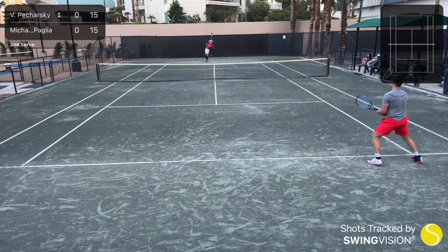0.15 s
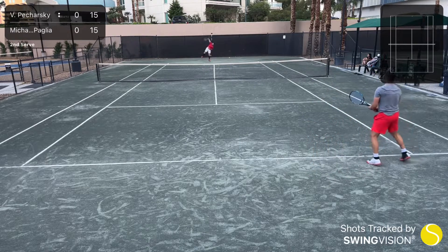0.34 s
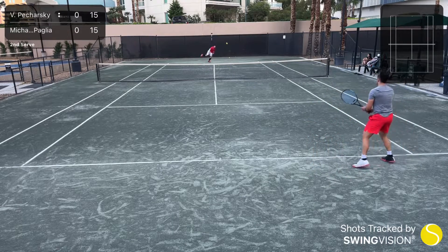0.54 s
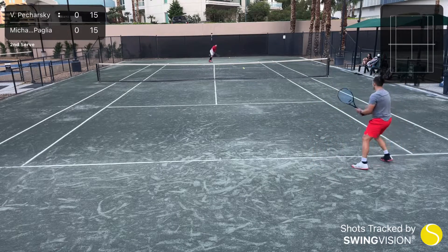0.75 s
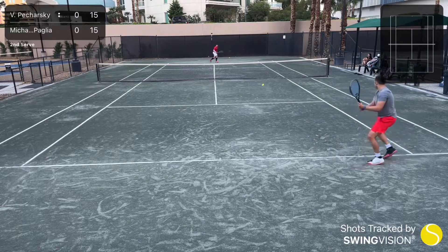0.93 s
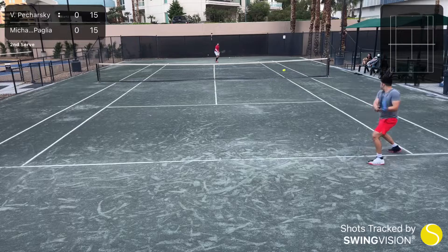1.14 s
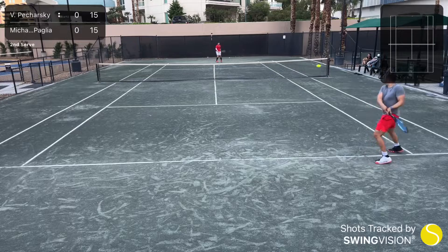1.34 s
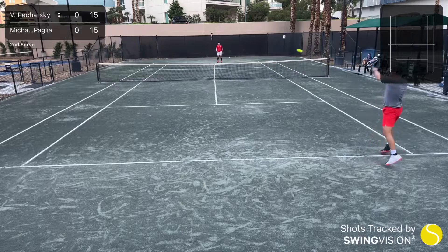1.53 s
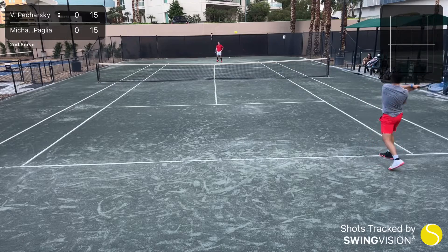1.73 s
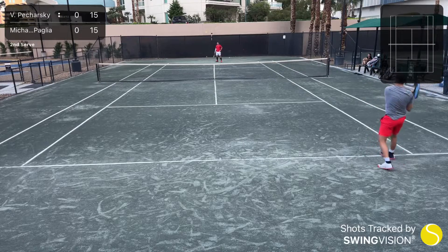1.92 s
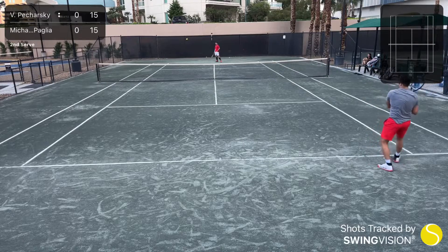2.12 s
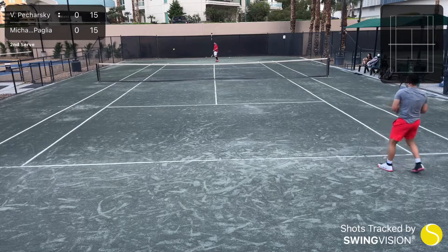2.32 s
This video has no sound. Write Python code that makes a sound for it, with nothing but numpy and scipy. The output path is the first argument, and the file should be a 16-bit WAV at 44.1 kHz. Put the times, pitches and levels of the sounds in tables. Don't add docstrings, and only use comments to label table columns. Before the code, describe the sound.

One sharp tennis racket hit at 1.5 seconds: a crack with briefly ringing strings, quick ground bounce and faint fence and wall echoes. Before it, shoes scuff gritty clay, strongest around 0.6 and 0.9; pebbles tick, and scrapes return near 1.9 and 2.35. Wind grows from 0.3, rumbling and slapping the bare microphone. Distant city wash and thin whine continue; a tiny bird chirps at 2.2.

```python
import sys
import numpy as np
from scipy import signal
from scipy.fft import rfft, irfft, next_fast_len
from scipy.io import wavfile
from scipy.ndimage import uniform_filter1d

SR = 44100
rng = np.random.default_rng(int(sys.argv[2]) if len(sys.argv) > 2 else 0)


def digitize_waveform(pressure):
    field = np.atleast_2d(pressure).T
    bounded = np.clip(field, -1, 1)
    quanta = np.round(bounded * 32767).astype(np.int16)
    wavfile.write(sys.argv[1], SR, quanta)


def invert_db(x):
    u = np.asarray(x, float) / 20
    return 10 ** u


N = 108706

# time in seconds, deep rumble in dB, flutter above it in dB.
GUST = [(0, -38, -2), (.15, -33, -11), (.33, -25.5, -8), (.45, -26.5, -12), (.56, -23.5, -4),
        (.68, -21, -10.5), (.78, -25.5, -4), (.88, -20, -4), (1.05, -22.5, -9), (1.2, -20.5, -11.5),
        (1.4, -22, -5), (1.5, -17, 0), (1.535, -29, 0.5), (1.62, -17.5, -1), (1.85, -19, -3.5),
        (2.05, -20.5, -3.5), (2.25, -21.5, -7.5), (2.46, -23, -7)]
# frequency in Hz, level in dB.
RUMBLE_SPECTRUM = [(20, -28), (40, -11), (60, -1), (95, -0.5), (130, -6), (200, -19), (400, -61.5)]
# frequency in Hz, level in dB.
FLUTTER_SPECTRUM = [(60, -50), (120, -6), (180, -0.5), (260, -5), (400, -14), (600, -25), (1000, -35.5),
                    (2000, -60.5)]
# start in seconds, peak in dB, pitch in Hz.
BUFFETS = [(.249, -18, 70), (0.3082, -15, 180), (.499, -15, 124), (.651, -11.5, 200), (0.689, -11.5, 242),
           (.728, -12, 196), (.771, -11, 221), (.79, -13.5, 254), (.838, -10.5, 116), (.9665, -13, 115),
           (1.026, -17, 234), (1.117, -6, 123), (1.283, -10.5, 114), (1.36, -9.5, 177), (1.428, -9.5, 190),
           (1.473, -9, 204), (1.555, -11, 240), (1.559, -10, 225), (1.564, -10, 225), (1.569, -9, 210),
           (1.573, -5, 165), (1.6, -7, 112), (1.656, -10, 280), (1.659, -8, 108.4), (1.676, -9, 133),
           (1.692, -9.5, 122), (1.725, -13.5, 172), (1.789, -12, 108), (1.845, -9.5, 118),
           (1.866, -10.5, 111), (1.9433, -12, 200), (1.998, -12, 274), (2.015, -13, 138),
           (2.058, -10.5, 123), (2.135, -12, 170), (2.1774, -10.5, 186), (2.345, -9, 121), (2.437, -14, 90)]
# frequency in Hz, density in dB per Hz.
WASH_SPECTRUM = [(300, -21.5), (600, -22), (900, -23), (1900, -30.5), (3000, -33), (5200, -41.5),
                 (9000, -45.5), (16000, -51)]
# loudest moment, rise and fall in seconds, level in dB, centre of the grit in Hz.
SCUFFS = [(.04, 0.09, 0.061, -42.5, 3770), (.31, 0.047, 0.1, -46.5, 12000),
          (.365, 0.073, 0.094, -44.5, 3600), (.455, 0.011, 0.019, -56, 13000), (.5, 0.057, 0.1, -41, 4770),
          (.585, 0.015, 0.055, -37.5, 5970), (.58, .02, .04, -41, 1200), (.599, 0.022, 0.018, -33, 2770),
          (.645, 0.013, 0.016, -47, 4460), (.76, 0.016, 0.024, -47.5, 5000), (.83, 0.023, 0.022, -41, 3900),
          (.912, 0.054, 0.054, -35, 1040), (.91, 0.024, .06, -37, 2100), (.955, 0.062, 0.043, -35.5, 3540),
          (.99, .03, 0.044, -46, 7000), (1.012, 0.019, 0.013, -38, 13000),
          (1.122, 0.0058, 0.018, -43, 7500), (1.137, 0.017, 0.0079, -36, 12000),
          (1.15, 0.024, 0.046, -55, 4000), (1.28, 0.025, 0.062, -38.5, 1250),
          (1.275, 0.012, 0.095, -43, 4900), (1.48, 0.05, 0.028, -46.5, 8040),
          (1.622, 0.022, 0.013, -43.5, 9000), (1.86, 0.11, 0.024, -41, 6900),
          (1.885, 0.055, 0.052, -34.5, 2440), (2.13, 0.043, 0.034, -51.5, 6460),
          (2.27, .01, .02, -61, 13000), (2.35, .014, 0.079, -36.5, 4900), (2.4, 0.042, 0.033, -37.5, 2630)]
# time in seconds, peak in dB,
# pitch in Hz.
PEBBLES = [(.03, -33, 6000), (0.058, -31, 2200), (.082, -40, 11000), (.26, -33.5, 10000), (.3, -36, 11000),
           (.312, -36, 14000), (.375, -26, 10000), (.45, -35, 14000), (.486, -35, 6000), (.313, -24, 335),
           (.339, -23, 7100), (.377, -23, 1090), (0.414, -30, 2500), (.545, -31, 3000), (.583, -17.5, 6000),
           (.643, -32, 5000), (.752, -43, 6000), (.82, -36, 5000), (.864, -25.5, 8000), (1.013, -30, 12000),
           (1.172, -38, 10000), (1.181, -38, 9000), (1.266, -34, 12000), (1.484, -33, 9000),
           (1.791, -33, 9000), (2.349, -26, 6500), (2.441, -31, 6000), (.905, -26, 750),
           (.929, -20.5, 1150), (.973, -27, 5000), (1.116, -31, 450), (1.15, -28, 3970), (1.556, -19, 420),
           (1.565, -23, 500), (1.579, -15.5, 380), (1.599, -21, 480), (1.589, -20, 330), (1.626, -25, 594),
           (1.68, -22, 420), (1.657, -15.5, 512), (1.6585, -30, 3000), (1.699, -28, 11000),
           (1.617, -20, 13500),
    (1.7158, -20, 13000),
    (1.7165, -20, 8500),
    (1.717, -14, 14500),
]
# frequency in Hz, level in dB.
CRACK_SPECTRUM = [(300, -15), (1000, 5), (2000, -11.5), (3500, 2), (5200, -4), (8000, -1), (12000, 0),
                  (16000, -3.5)]
STRING_HZ = [300, 550, 925, 1040, 1700, 2250, 3200, 4200, 4950, 5500, 7100]
# level in dB, time to fall 60 dB in seconds.
STRINGS = [(-10.5, 0.059), (-14.5, 0.046), (-14, 0.04), (-19.5, 0.051), (-29, 0.044), (-28, 0.037),
           (-17.5, 0.031), (-18, 0.03), (-17.5, 0.023), (-22, 0.021), (-20, 0.028)]
# delay in seconds, level in dB.
ECHOES = [
    (0.02, -21),
    (.06, -18),
    (.153, -22.5),
]
# start and length in seconds, first and last pitch in Hz, level in dB.
CHIRPS = [
    (2.194, .066, 4750, 2800, -53),
    (2.265, .025, 3500, 2950, -58),
]
# frequency in Hz, gain in dB.
MIC_RESPONSE = [(2000, 0.5), (9000, -5.5), (9700, -13), (11000, -12.5), (13000, -5.5), (15700, -5),
                (16000, -26), (16500, -34)]

STEADY_S, STEADY_SHARE = 0.038, 0.38
FLAPS_DB, FLUTTER_DB = 3.0, -1.5
BUFFET_CYCLES, BUFFET_SAG, BUFFET_DB = 2.64, 0.16, -1
BUFFET_EDGE_DB = -15
WASH_DB = -44
WHINE_HZ, WHINE_DB = 2225, -62
GRAINS_PER_S, GRAIN_SPREAD_DB, HISS_SHARE, CLUMPS_DB = 4000, 5, 0.46, 1.0
BITE, LIFT = 1.7, 2.5
SETTLE_DB, SETTLE_S = -8.5, 0.048
GRIT_OCTAVES = 1.25
SPRAY_DB, SPRAY_TILT_DB = -10.5, -2.5
PEBBLE_CYCLES, PEBBLE_RING_DB, PEBBLE_RING_CYCLES = 0.62, -13, 4.2
HIT_S = 1.4995
CRACK_DB, CRACK_T60_S, CRACK_RISE_S = -16, 0.026, 0.00076
STRING_RISE_S = 0.0033
SNAP_DB, SNAP_HZ, SNAP_T60_S = -17, 11000, 0.016
GROUND_S, GROUND_DB, GROUND_TOP_HZ = 0.0038, 3.5, 11000
ECHO_TOP_HZ, ECHO_SMEAR_S = 1500, 0.0038
YARD_DB, YARD_T60_S, YARD_TOP_HZ = -40, 0.42, 9000
FENCE_S, FENCE_HZ, FENCE_DB, FENCE_T60_S = 0.0615, 1020, -28, 0.08
CHIRP_BEND, CHIRP_EDGE, CHIRP_SWELL_DB, CHIRP_WAVER = 1.35, 0.3, 6, 0.2
LIMIT = 0.75


def evened(x):
    return x / np.sqrt(np.mean(x ** 2) + 1e-20)


def smoothed(x, size):
    return uniform_filter1d(uniform_filter1d(x, size=size), size=size)


def read(points, hz):
    f, value = np.transpose(points)
    return np.interp(np.log(hz + 1), np.log(f + 1), value)


def octaves_below(hz, corner_hz):
    return np.log2(np.maximum(corner_hz / (hz + 1), 1))


def add(mix, s, sound):
    at = round(s * SR)
    part = mix[max(at, 0):][:len(sound) + min(at, 0)]
    part += sound[max(-at, 0):][:len(part)]


def colour(x, db_of):
    size = next_fast_len(len(x))
    return irfft(rfft(x, size) * invert_db(db_of(np.fft.rfftfreq(size, 1 / SR))), size)[:len(x)]


def buffet(peak_db, hz):
    u = np.arange(0, BUFFET_CYCLES / hz, 1 / SR) * hz / BUFFET_CYCLES
    turn = 2 * np.pi * BUFFET_CYCLES * (u - BUFFET_SAG * u ** 2)
    swing = np.sin(turn) + invert_db(BUFFET_EDGE_DB) * (1 - u) * np.sin(2 * turn)
    return -invert_db(peak_db + BUFFET_DB) * np.sin(np.pi * u ** 0.56) ** 2 * swing


def wind():
    s, rumble_db, above_db = np.transpose(GUST)
    t = np.arange(N) / SR
    rumble = evened(colour(rng.standard_normal(N), lambda hz: read(RUMBLE_SPECTRUM, hz)))
    power = uniform_filter1d(rumble ** 2, round(STEADY_S * SR))
    rumble = evened(rumble / (power + 0.02) ** (STEADY_SHARE / 2))
    flaps = evened(smoothed(rng.standard_normal(N), 500))
    flapping = rng.standard_normal(N) * invert_db(FLAPS_DB * np.clip(flaps, -2, 2))
    flutter = evened(colour(flapping, lambda hz: read(FLUTTER_SPECTRUM, hz)))
    flutter_gain = invert_db(FLUTTER_DB + np.interp(t, s, above_db))
    out = invert_db(np.interp(t, s, rumble_db)) * (rumble + flutter_gain * flutter)
    for start, peak_db, hz in BUFFETS:
        add(out, start, buffet(peak_db, hz))
    return out


def wash():
    size, hop = 1024, 256
    hz = np.fft.rfftfreq(size, 1 / SR)
    real, imag, patches = rng.standard_normal((N // hop + 5, len(hz), 3)).T
    patches = uniform_filter1d(uniform_filter1d(patches, size=10, axis=0), size=10, axis=1)
    db = read(WASH_SPECTRUM, hz) - 30 * octaves_below(hz, 300)
    spectra = (real + 1j * imag) * invert_db(db[:, None] + 1.6 * evened(patches))
    return invert_db(WASH_DB) * evened(signal.istft(spectra, nperseg=size, noverlap=size - hop)[1][:N])


def whine():
    drift = evened(uniform_filter1d(rng.standard_normal(N), size=4000))
    return invert_db(WHINE_DB) * np.sin(2 * np.pi * np.cumsum(WHINE_HZ + 4 * drift) / SR)


def clay_grit():
    size = invert_db(GRAIN_SPREAD_DB * np.minimum(rng.exponential(1, N), 3))
    grains = size * (rng.random(N) < GRAINS_PER_S / SR) * rng.choice([-1., 1.], N)
    clumps = invert_db(CLUMPS_DB * evened(smoothed(rng.standard_normal(N), 150)))
    return clumps * ((1 - HISS_SHARE) * evened(grains) + HISS_SHARE * rng.standard_normal(N))


def sole_pressure(t, rise, fall):
    landing = np.cos(np.pi / 2 * t / rise).clip(0) ** BITE
    lifting = np.exp(-2 * abs(t / fall) ** LIFT)
    settling = invert_db(SETTLE_DB) * np.exp(-abs(t) / SETTLE_S)
    return np.where(t < 0, landing, (lifting + settling) / (1 + invert_db(SETTLE_DB)))


def pebble(db, hz):
    t = np.arange(-200, 600) / SR
    knock = np.exp(-(t * hz / PEBBLE_CYCLES) ** 2 * 2)
    ring = invert_db(PEBBLE_RING_DB) * (t > 0) * np.exp(-abs(t) * hz / PEBBLE_RING_CYCLES)
    return invert_db(db) * (knock + ring) * np.cos(2 * np.pi * hz * t)


def shoes():
    grit = clay_grit()
    out = np.zeros(N)
    for k, (top, rise, fall, db, centre_hz) in enumerate(SCUFFS):
        def stroke_db(hz):
            hump = -6 * (np.log2((hz + 1) / centre_hz) / GRIT_OCTAVES) ** 2
            spray = SPRAY_DB + SPRAY_TILT_DB * np.log2(np.maximum(hz / 4000, 1))
            return np.maximum(hump, spray - 8 * octaves_below(hz, 1500))

        t = np.arange(-rise, 2 * fall + 3 * SETTLE_S, 1 / SR)
        fresh = np.roll(grit, shift=-k * N // 31)[:len(t)]
        add(out, top - rise, invert_db(db) * sole_pressure(t, rise, fall) * evened(colour(fresh, stroke_db)))
    for s, db, hz in PEBBLES:
        add(out, s - 200 / SR, pebble(db, hz))
    return out


def surroundings(near, t):
    smear = rng.standard_normal(2000) * np.exp(-t[:2000] / ECHO_SMEAR_S)
    smeared = signal.fftconvolve(near, smear / np.linalg.norm(smear))[:len(t)]
    dull = colour(smeared, lambda hz: -6 * (hz / ECHO_TOP_HZ) ** 0.71)
    tail = evened(colour(rng.standard_normal(len(t)),
                         lambda hz: read(CRACK_SPECTRUM, hz) - 6 * (hz / YARD_TOP_HZ) ** 2))
    add(near, 0.004, invert_db(YARD_DB - 60 * t / YARD_T60_S) * np.minimum(t / 0.006, 1) * tail)
    for delay, db in ECHOES:
        add(near, delay, invert_db(db) * dull)
    fence = invert_db(FENCE_DB - 60 * t / FENCE_T60_S) * np.sin(2 * np.pi * FENCE_HZ * t)
    add(near, FENCE_S, np.minimum(t / 0.008, 1) * fence)


def racket():
    t = np.arange(0, 0.5, 1 / SR)
    rise = np.minimum(t / CRACK_RISE_S, 1)

    def burst():
        noise = evened(colour(rng.standard_normal(len(t)), lambda hz: read(CRACK_SPECTRUM, hz)))
        return rise * noise * invert_db(CRACK_DB - 60 * t / CRACK_T60_S)

    ring = np.zeros(len(t))
    for hz, (db, t60) in zip(STRING_HZ, STRINGS):
        ring -= invert_db(db - 60 * t / t60) * np.sin(2 * np.pi * hz * t)
    ring *= np.minimum(t / STRING_RISE_S, 1)
    snap = evened(colour(rng.standard_normal(len(t)), lambda hz: -12 * octaves_below(hz, SNAP_HZ)))
    near = burst() + ring + rise * snap * invert_db(SNAP_DB - 60 * t / SNAP_T60_S)
    bounce = colour(burst(), lambda hz: -6 * (hz / GROUND_TOP_HZ) ** 2)
    add(near, GROUND_S, invert_db(GROUND_DB) * bounce)
    surroundings(near, t)
    out = np.zeros(N)
    add(out, HIT_S, near)
    return out


def bird():
    out = np.zeros(N)
    for s, length, first_hz, last_hz, db in CHIRPS:
        u = np.arange(0, length, 1 / SR) / length
        hz = first_hz + (last_hz - first_hz) * u ** CHIRP_BEND
        waver = 1 + CHIRP_WAVER * evened(uniform_filter1d(rng.standard_normal(len(u)), size=120))
        swell = invert_db(db + CHIRP_SWELL_DB * (u - 0.5)) * np.sin(np.pi * u) ** CHIRP_EDGE
        add(out, s, waver * swell * np.sin(2 * np.pi * np.cumsum(hz) / SR))
    return out


def scene():
    return (wind() + wash() + whine() + shoes() + racket() + bird())[None]


def band_limit(x):
    return signal.sosfilt(signal.butter(12, 16520, fs=SR, output="sos"), x)


def record(dry):
    heard = colour(dry[0], lambda hz: read(MIC_RESPONSE, hz))
    limited = heard / (1 + (heard / LIMIT) ** 4) ** (1 / 4)
    finished = colour(limited, lambda hz: -60 * (hz > 16600))[None]
    return band_limit(finished)


dry = scene()
out = record(dry)
digitize_waveform(out)
```